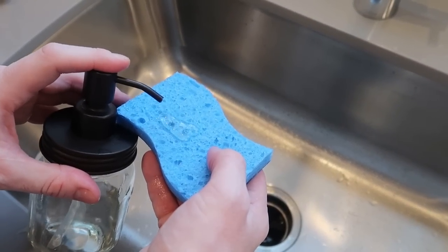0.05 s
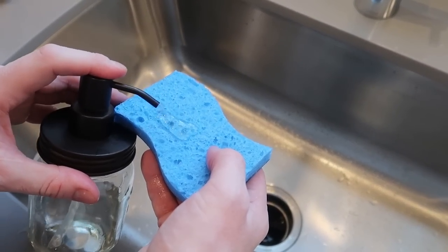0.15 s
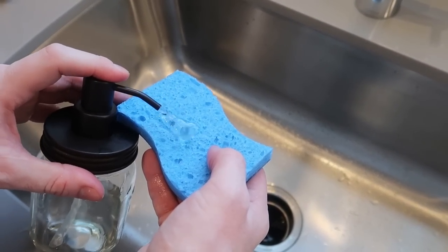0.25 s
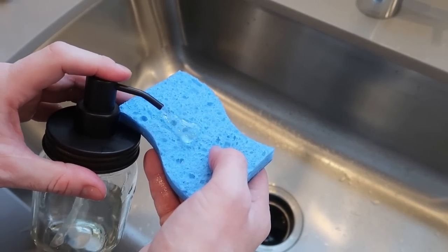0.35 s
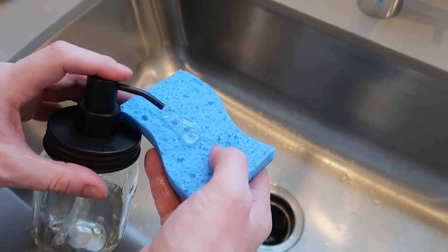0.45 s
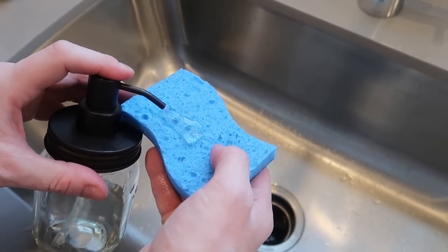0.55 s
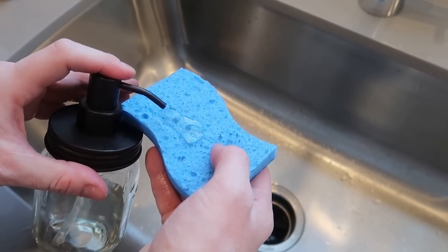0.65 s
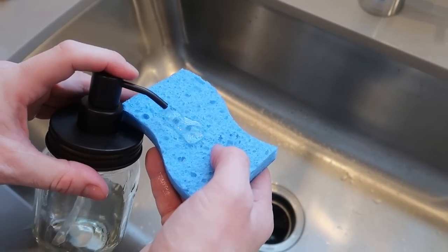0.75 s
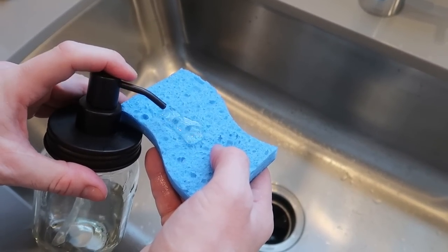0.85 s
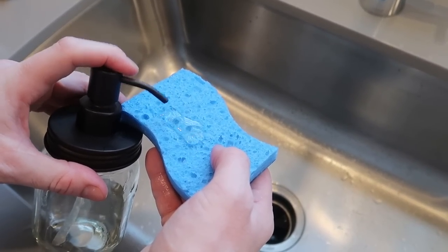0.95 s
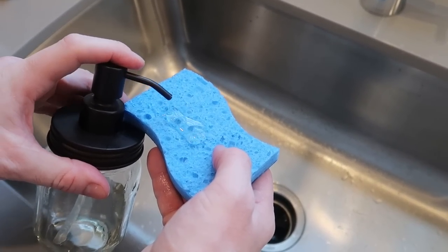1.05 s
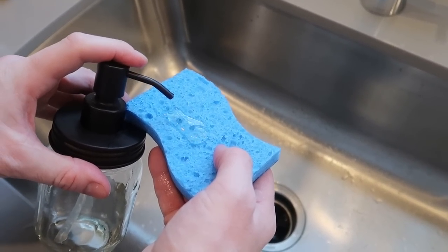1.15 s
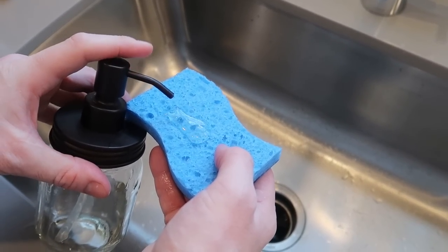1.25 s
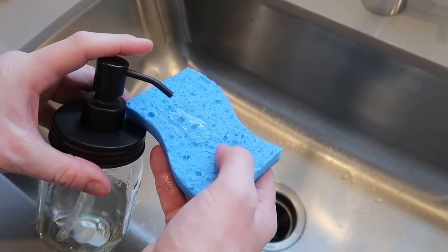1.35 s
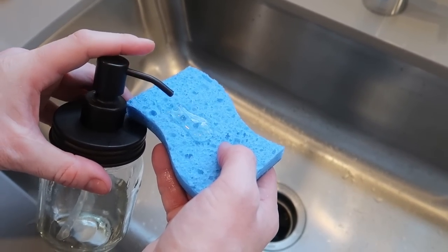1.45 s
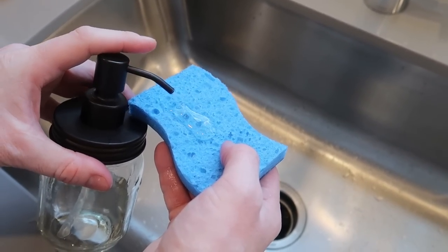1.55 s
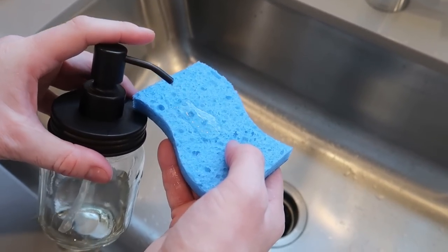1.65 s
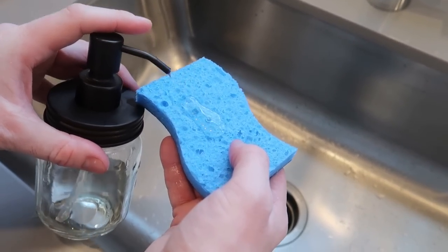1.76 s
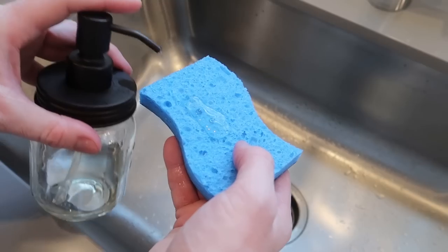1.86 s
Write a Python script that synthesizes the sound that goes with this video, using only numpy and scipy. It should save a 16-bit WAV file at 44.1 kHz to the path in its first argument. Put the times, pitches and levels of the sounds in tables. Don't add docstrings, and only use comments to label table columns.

```python
import sys
import numpy as np
from scipy import signal
from scipy.fft import rfft, irfft
from scipy.io import wavfile

SR = 44100
rng = np.random.default_rng(int(sys.argv[2]) if len(sys.argv) > 2 else 0)


def digitize_waveform(pressure):
    field = np.atleast_2d(pressure).T
    bounded = np.clip(field, -1, 1)
    quanta = np.round(bounded * 32767).astype(np.int16)
    wavfile.write(sys.argv[1], SR, quanta)


def gain_from_db(level_db):
    decades = np.asarray(level_db, float) / 20
    return 10 ** decades


N = 83790
T = np.arange(N) / SR
F = np.fft.rfftfreq(N, 1 / SR)


def shaped(gain, x):
    return irfft(rfft(x) * gain, N)


def unit(x):
    return x / np.sqrt(np.mean(x ** 2))


def read(table, hz):
    points = np.array(table)
    return np.interp(np.log(hz + 1e-9), np.log(points[:, 0]), points[:, 1])


def wander(rate_hz):
    return unit(shaped(np.exp(-(F / rate_hz) ** 2) * (F > 0), rng.standard_normal(N)))


def ring(at, hz, db, t60, rise_ms, turn=0):
    out = np.zeros(N)
    start = int(at * SR) + 1
    u = T[start:start + int(1.5 * t60 * SR)] - at
    rise = (1 - np.exp(-1000 * u / rise_ms)) ** 2
    out[start:start + len(u)] = gain_from_db(db - 60 * u / t60) * rise * np.sin(2 * np.pi * (hz * u + turn))
    return out


# pitch in Hz, rms level in dB, width in Hz.
HUM = [(61.1, -56, 14), (114.4, -54, 24), (238, -60, 3.3), (247, -66, 13), (297.1, -51, 2.6),
       (466.5, -63, 23.6), (484, -67, 2.6), (837, -68, 7.8)]


def fridge():
    out = 0
    for hz, db, width_hz in HUM:
        level = gain_from_db(db + 2.0 * wander(width_hz)) * np.sqrt(2)
        phase = 1.09 * wander(width_hz) + 6 * rng.random()
        out = out + level * np.sin(2 * np.pi * hz * T + phase)
    return out


# frequency in Hz, density in dB per Hz.
AIR = [(15, -45), (25, -9), (86, 2.5), (188, -7), (305, -3.5), (349, -12.5), (3530, -28), (11800, -42),
       (15500, -58)]
# frequency in Hz, side minus mid in dB.
AIR_SIDE = [(60, -84), (110, -16), (200, -12), (380, -2), (700, -1.5), (1290, 0.5), (2380, 2), (4400, 3),
            (8120, 1.5), (15000, -0.5)]


def room_air():
    level_db, drift_db, drift_hz = -49.5, 1.0, 5.3
    mid, side = 0, 0
    for hz in 30 * 2. ** np.arange(10):
        octaves = np.clip(np.log2(F / hz + 1e-9), -1, 1)
        band = gain_from_db(read(AIR, F)) * np.cos(octaves * np.pi / 2)
        drift = gain_from_db(drift_db * wander(drift_hz))
        mid = mid + drift * shaped(band, rng.standard_normal(N))
        side = side + drift * shaped(band * gain_from_db(read(AIR_SIDE, F)), rng.standard_normal(N))
    gain = gain_from_db(level_db) / np.std(mid)
    return gain * mid, gain * side


# start in seconds, level in dB, pitch in Hz, T60 in seconds, rise in ms.
PINGS = [(.091, -42, 1260, 0.034, 1.7), (.091, -62, 10900, .04, 2), (.2272, -30, 3050, 0.023, 0.95),
         (.2272, -30, 3700, .02, 0.46), (.2278, -26, 11920, .012, 0.45), (.2322, -35, 11180, .02, .6),
         (.2322, -48, 12800, 0.024, .6), (.231, -44, 6030, .09, 1.2), (.259, -41, 1110, 0.031, 1.5),
         (.3155, -30, 3000, 0.025, 0.59), (.3155, -50, 8400, 0.026, 0.53), (.311, -55, 11260, .05, 2),
         (.3095, -60, 14600, .02, 1), (.309, -45, 5400, 0.022, 1), (.338, -15.5, 337.6, .1, 7.3),
         (.343, -35, 1190, 0.039, 2.8), (.415, -35, 324, 0.091, 4.5), (1.263, -42, 1433, 0.052, 2.4),
         (1.281, -33.5, 295.4, 0.12, 2.6), (1.379, -52, 1800, .03, 2), (1.389, -46.5, 1680, 0.028, 2),
         (1.492, -44, 3050, .02, 1.5), (1.492, -45, 3460, 0.019, 1.5), (1.491, -47, 4180, .02, 1.5),
         (1.492, -50, 5340, 0.019, 1.1), (1.516, -47, 5250, .02, 2), (1.517, -50, 3000, .02, 1.5),
         (1.581, -53, 2920, .03, 2), (1.590, -52, 2900, .02, 1.5), (1.608, -51, 1440, .05, 2.6),
         (1.609, -53, 2130, .02, 1.7), (1.619, -54, 3550, 0.033, 2), (1.714, -49, 3080, 0.023, 2),
         (.3154, -37.5, 4310, 0.01, 0.54), (1.051, -46, 8400, 0.018, 0.92), (1.262, -33.5, 734, .03, 1.6),
         (0.2254, -29.5, 1343, 0.025, 1.3), (.328, -27, 933, 0.058, 2.7), (0.346, -42, 1502, 0.079, 3.6)]


def pump_pings():
    return sum(ring(at, hz, db, t60, rise_ms) for at, db, hz, t60, rise_ms in PINGS)


# start in seconds, level in dB, contact in ms.
JOLTS = [(.143, -37, 2.16), (0.179, -31.5, 3.1), (0.231, -22.5, 2.5), (0.259, -34.5, 0.72), (.290, -23, 2),
         (.317, -22, 0.55), (.331, -29.5, 0.61), (.842, -38, 2.4), (1.067, -33.5, 0.49),
         (1.260, -37.5, 0.61), (1.386, -42, 2.2), (1.507, -50, 1.2), (1.606, -33.5, 1.14)]
# frequency in Hz, level in dB, T60 in seconds.
BASIN = [(236, -8, 0.17), (266, -4, 0.18), (337.5, -8, 0.3), (376.2, -9, 0.24), (453.2, -11.5, 0.24),
         (556, -3.5, 0.06), (590, -7.5, 0.059), (745, -13, 0.1), (857, -10, 0.1), (1060, -13, 0.054),
         (1171, -14, 0.12), (1500, -38, 0.11), (1950, -14, 0.061)]


def basin():
    out = 0
    spots = rng.standard_normal((len(JOLTS), len(BASIN), 2))
    for (at, db, contact_ms), spot in zip(JOLTS, spots):
        for (hz, mode_db, t60), (spot_db, turn) in zip(BASIN, spot):
            dull_db = 10 * np.log10(1 + (hz * contact_ms / 1000) ** 4)
            out = out + ring(at, hz, db + mode_db + spot_db - dull_db, t60, contact_ms, turn)
    return out


# start in seconds, level in dB.
BOOMS = [
    (0.16, -26.5),
    (0.226, -12.5),
    (0.3, -13),
    (0.842, -37),
    (1.061, -22),
    (1.61, -35),
]


def basin_boom():
    center_hz, split_hz, t60_s, rise_ms = 114.5, 8.82, .3, 22
    beat = sum(ring(at, split_hz / 2, db, t60_s, rise_ms) for at, db in BOOMS)
    return 2 * beat * np.cos(2 * np.pi * center_hz * T)


# start in seconds, level in dB, pitch in Hz, T60
# in seconds, rise in ms.
KNOCKS = [(.188, -37.5, 1270, 0.027, 2.1), (0.2246, -26.5, 1074, 0.037, 1.2),
          (.2285, -22.5, 591, 0.052, 1.2), (.3153, -15.5, 970, 0.016, 0.056),
          (.317, -14.5, 339.8, 0.102, 1.33), (.375, -25.5, 333, 0.068, 3.1), (.839, -39, 1036, 0.055, 0.53),
          (1.0588, -25.5, 1065, 0.051, 1.3), (0.2237, -28.5, 1335, 0.018, 1.2),
          (0.3159, -32.5, 1950, 0.017, 0.19), (1.074, -35, 1170, 0.082, 5), (1.073, -29.5, 590, 0.064, 3.3),
          (1.256, -33.5, 995, 0.028, 1.5), (1.260, -25.5, 590, 0.024, 2.3), (1.284, -33, 610, 0.044, 1.6),
          (1.604, -20.5, 687, 0.035, 2.5), (1.615, -34.5, 550, 0.14, 5.1), (1.616, -35.5, 745, 0.1, 2.4),
          (1.622, -31.5, 332, 0.1, 3.7),
          (.178, -38.5, 568, 0.068, 2.6),
    (.2328, -15, 238, 0.0384, 0.89),
    (.258, -22, 589, 0.044, 2),
    (.295, -26, 590, 0.07, 3),
    (0.842, -30, 207, 0.042, 1.04),
    (1.064, -24, 281, 0.041, 1),
    (1.092, -26, 302, 0.054, 3),
    (1.267, -34.5, 282, 0.068, 2.9),
]
# ratio to pitch, level in dB.
KNOCK_PARTIALS = [(1.288, -13), (1.9, -18.5)]


def thuds_and_knocks():
    out = 0
    for at, db, hz, t60, rise_ms in KNOCKS:
        for ratio, partial_db in [(0.97, 0.0274)] + KNOCK_PARTIALS:
            out = out + ring(at, hz * ratio, db + partial_db, t60 / ratio, rise_ms)
    return out


# start in seconds, level in dB, centre in Hz, rise in ms, fall in ms.
CLICKS = [(0.228, -34.5, 12000, 1.6, 0.92), (0.2291, -30.5, 3250, 1.56, 0.93),
          (0.232, -42, 12450, 0.4, 2.2), (0.231, -47.5, 6060, 3.6, 15), (.265, -52, 3040, 15, 23),
          (0.227, -44, 1970, 2, 1.5), (.228, -47, 7900, 1.05, 1.4), (0.235, -47.5, 3500, 2.1, 8.9),
          (0.298, -58, 3100, 2.2, 2.1), (0.3123, -48.5, 3540, 3.4, 0.55), (0.3165, -30.5, 3300, 0.66, 0.74),
          (0.3157, -31.5, 1590, 0.093, 0.91), (0.316, -46, 7600, 0.81, 0.93), (0.32, -45.5, 3170, 1.2, 8.2),
          (0.842, -59, 4000, .3, 3.9), (1.053, -60, 8500, 0.47, 1), (1.0605, -51.5, 11800, .6, 1.8),
          (1.062, -50, 14500, 0.5, 1.7), (1.069, -54, 11800, .6, 1.3), (1.583, -61, 3000, 3.7, 5.8),
          (1.609, -55.5, 1270, 11, 3.9), (1.717, -58, 3070, 2.5, 2.5)]
# start in seconds, level in dB, centre in Hz, rise in ms, fall in ms.
RUBS = [
    (0.253, -46.5, 930, 13, 17),
    (0.3263, -39, 1250, 10, 17.5),
    (1.071, -53.5, 3450, 23, 9.6),
    (1.076, -52.5, 6900, 8.8, 7.9),
    (.27, -35, 340, 11, 45),
    (1.4, -49, 960, 20, 12),
    (1.397, -51, 670, 11., 13),
    (0.3, -36, 302, 21, 29),
]


def clicks_and_rubs():
    width, narrowing = .34, .75
    out = 0
    for at, db, hz, rise_ms, fall_ms in CLICKS + RUBS:
        grit = rng.standard_normal(N) * gain_from_db(2 * rng.exponential(size=N))
        shape = np.exp(np.where(T < at, (T - at) / rise_ms, (at - T) / fall_ms) * 1000)
        detune = (F / hz - hz / (F + 1)) / (2 * width)
        band = 1 / (1 + (detune * max(hz / 3000, 1) ** narrowing) ** 4)
        out = out + gain_from_db(db) * unit(shaped(band, shape * grit)) * np.sqrt(np.mean(shape ** 2))
    return out


# start in seconds, level in dB, delay until the hand damps it in seconds.
CLINKS = [
    (0.233, -61, .025),
    (1.066, -44.5, 0.068),
    (1.073, -57, .059),
]
# frequency in Hz, level in dB, T60 in seconds, rise in ms.
JAR = [(2720, -23, 0.079, 3.1), (3050, -6.5, 0.064, 2.3), (4070, -5, 0.09, 2.2), (4985, -9, .04, 2.3),
       (5378, -0.5, 0.18, 5.5), (6070, -4.5, 0.083, 2.1), (6460, 0, 0.064, 2.9), (6560, -1, 0.078, 2.8),
       (8070, -11, .09, 3), (9000, -4.5, .05, 4.0)]


def jar():
    grip_s = 0.0026
    out = 0
    spots = rng.standard_normal((len(CLINKS), len(JAR), 2))
    for (at, db, held_s), spot in zip(CLINKS, spots):
        grip = np.exp(-np.maximum(T - at - held_s, 0) / grip_s)
        for (hz, mode_db, t60, rise_ms), (spot_db, turn) in zip(JAR, spot):
            out = out + grip * ring(at, hz, db + mode_db + spot_db, t60, rise_ms, turn)
    return out


def tail():
    t60_low_s, t60_high_s, split_hz, onset_s, dull_hz = 0.37, 0.06, 1300, 0.0028, 3500
    noise = rng.standard_normal(N)
    low = 1 / (1 + (F / split_hz) ** 2)
    response = shaped(low, noise) * gain_from_db(-60 * T / t60_low_s)
    response = response + shaped(1 - low, noise) * gain_from_db(-60 * T / t60_high_s)
    response = response * np.minimum(T / onset_s, 1)
    color = F / (F + 200) / (1 + F / dull_hz)
    return rfft(response / np.sqrt(np.sum(response ** 2))) * color


def scene():
    room_db, room_side_db, left_lead_s, left_db = -10.5, -8, 24e-6, .7
    mid, side = room_air()
    mid = mid + fridge()
    near = pump_pings() + basin() + basin_boom() + thuds_and_knocks() + clicks_and_rubs() + jar()
    mid = mid + gain_from_db(room_db) * shaped(tail(), near)
    side = side + gain_from_db(room_db + room_side_db) * shaped(tail() * F / (F + 2500), near)
    half = np.exp(1j * np.pi * F * left_lead_s) * gain_from_db(left_db * F / 8000)
    left = shaped(half, near) + mid + side
    right = shaped(1 / half, near) + mid - side
    return np.array([left, right])


def top_cut(x):
    return signal.sosfilt(signal.butter(12, 15700, fs=SR, output="sos"), x)


def record(dry):
    top_hz = 15500
    mix = shaped(1 / (1 + (F / top_hz) ** 80), dry)
    return top_cut(mix)


dry = scene()
out = record(dry)
digitize_waveform(out)
```